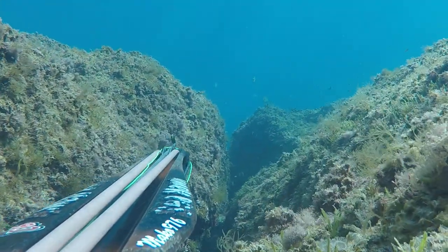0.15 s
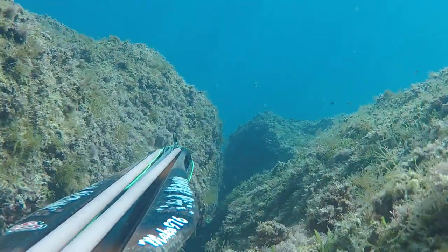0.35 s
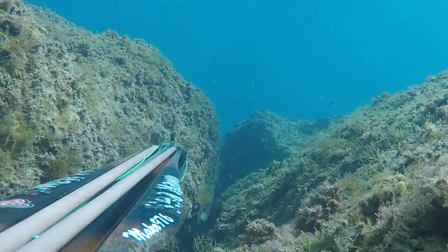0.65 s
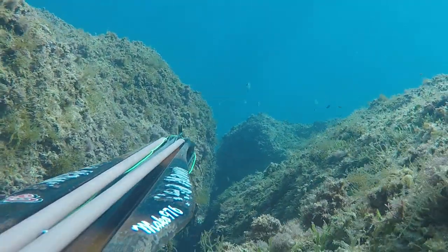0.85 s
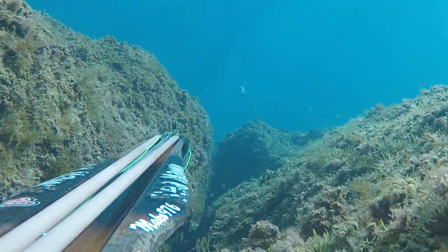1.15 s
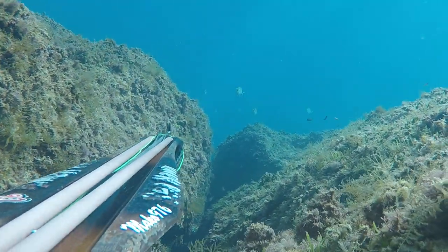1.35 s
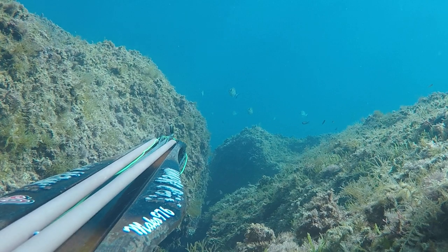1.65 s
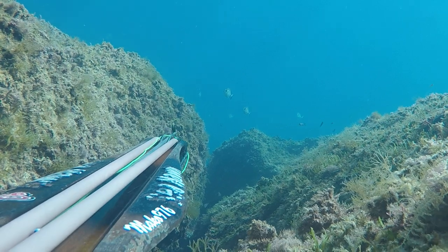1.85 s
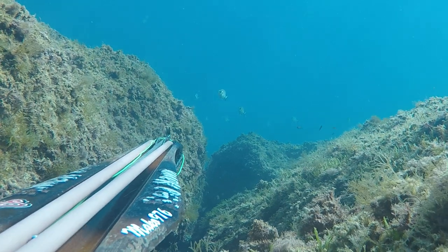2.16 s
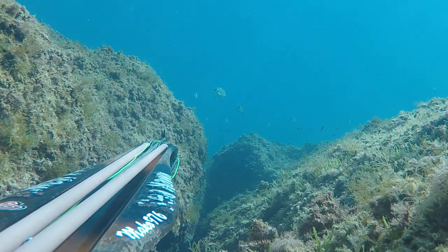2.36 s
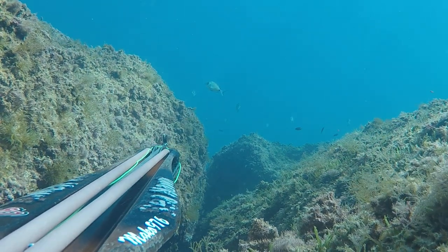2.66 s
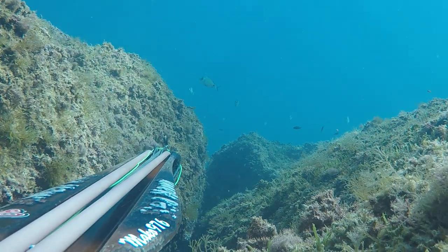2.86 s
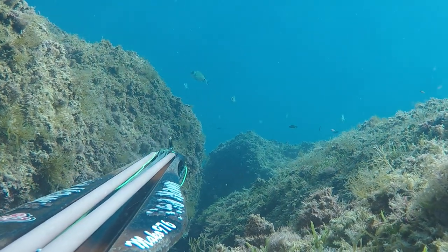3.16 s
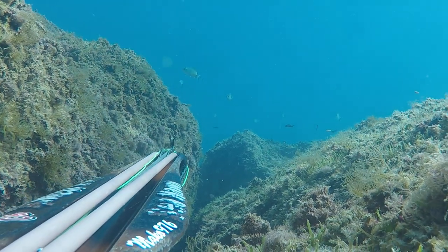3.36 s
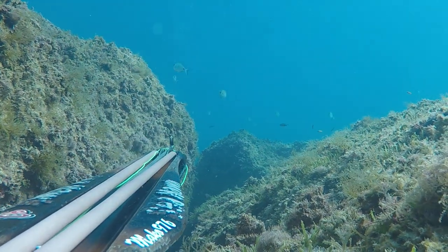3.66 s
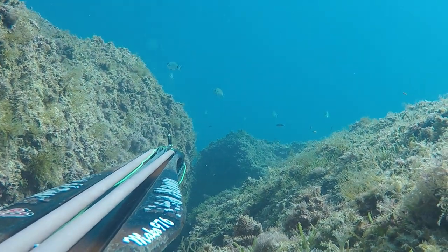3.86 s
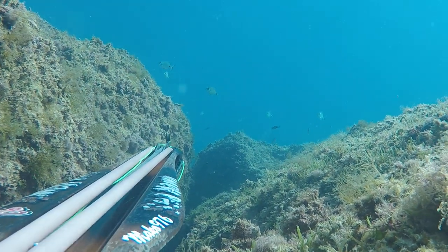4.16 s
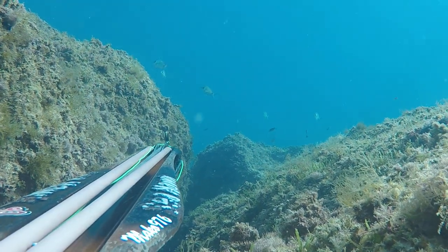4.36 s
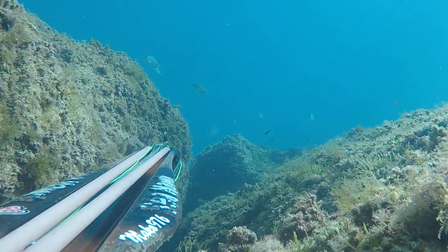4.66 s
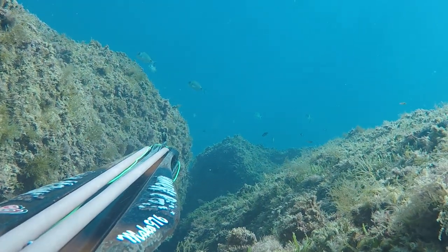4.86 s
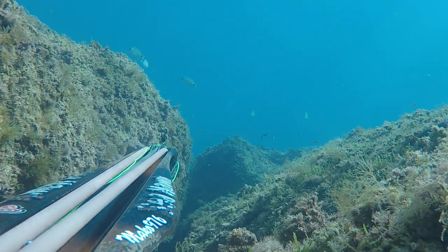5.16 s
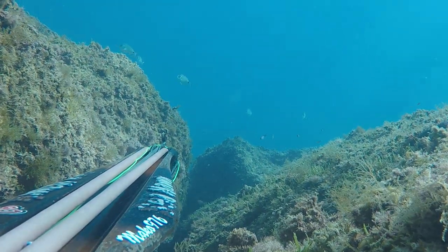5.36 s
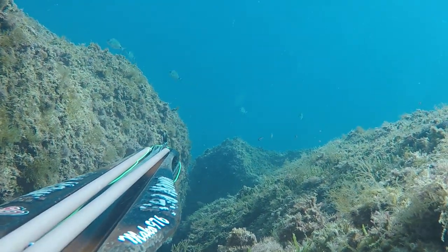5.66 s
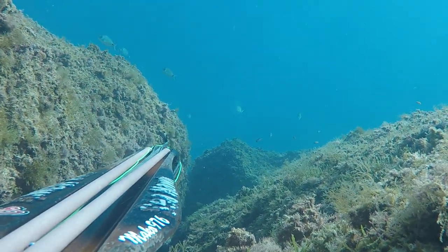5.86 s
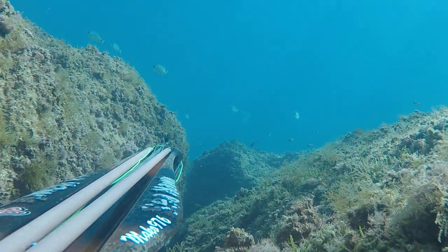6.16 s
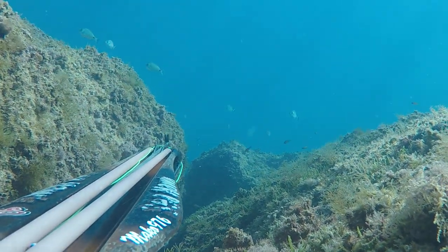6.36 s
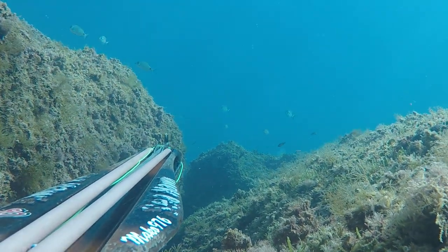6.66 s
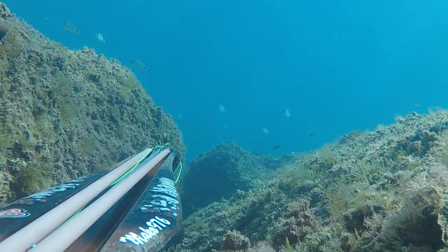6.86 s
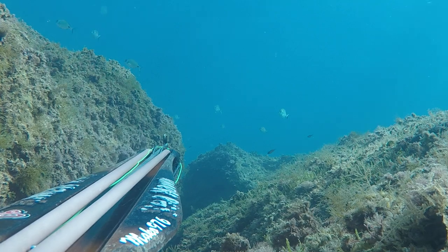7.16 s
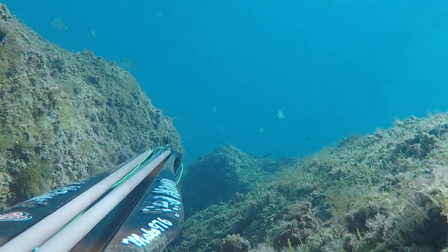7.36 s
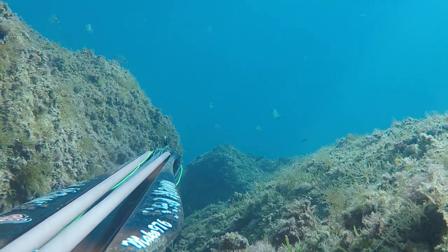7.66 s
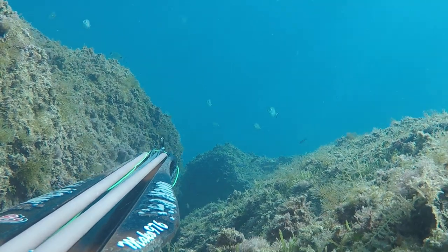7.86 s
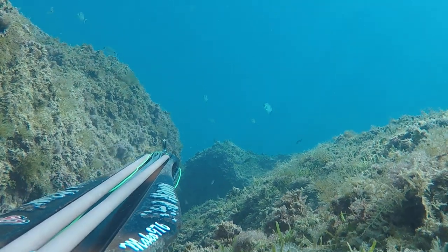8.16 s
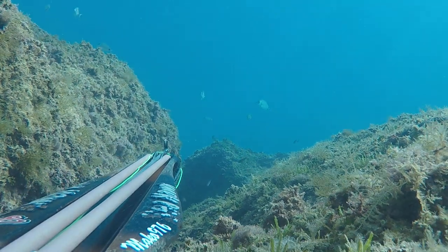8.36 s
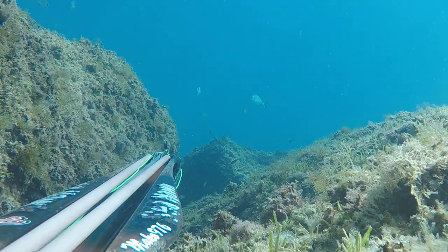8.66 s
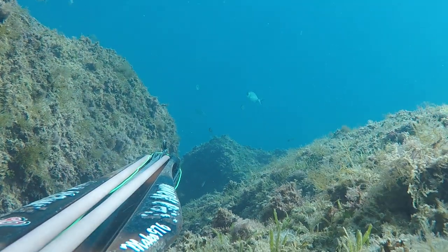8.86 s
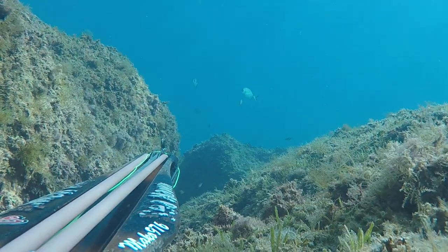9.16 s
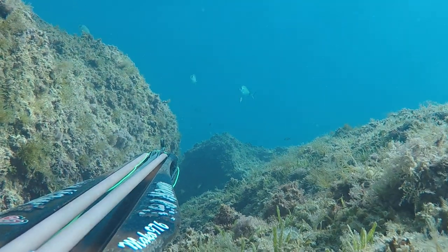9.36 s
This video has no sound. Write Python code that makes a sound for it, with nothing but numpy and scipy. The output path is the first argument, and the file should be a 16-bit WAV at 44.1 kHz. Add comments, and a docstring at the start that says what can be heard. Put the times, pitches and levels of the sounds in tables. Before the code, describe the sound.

Heard underwater through a sealed camera case, a constant uneven crackle of snapping shrimp sits over soft sea hiss and occasional bubble-like pops. The closest snaps ring the shell briefly. Soft taps and muffled rubbing of a diver's gear open the scene, followed by two pairs of low thuds, the second pair stronger. The shrimp carry on among the rocks, and light bumps and rubs return near the end.

```python
"""A camera in a sealed housing rests by a rocky sea floor. From the start, shrimp snap near and far and
ring the housing, over sea hiss and round pops. In the first 1.5 s, soft taps sound on the shell and light
knocks and rubs reach it through the diver's gear. Heavy double knocks land near 1.6, 1.8, 3.8 and 4 s;
the deep sway of the water then peaks. From 7.4 s the gear knocks and rubs again.
Two microphones inside hear the same shell, the left one weaker and shifted in phase."""
import sys
import numpy as np
from scipy import signal
from scipy.fft import rfft, irfft
from scipy.io import wavfile

SR = 44100
rng = np.random.default_rng(int(sys.argv[2]) if len(sys.argv) > 2 else 0)


def pcm_store(signal):
    """Save signal as 16-bit PCM."""
    levels = np.round(np.clip(np.atleast_2d(signal), -1, 1) * 32767)
    wavfile.write(sys.argv[1], SR, levels.astype(np.int16).T)


N = 418950
BIN_HZ = np.maximum(np.arange(N // 2 + 1) * SR / N, 1)

# Near shrimp snaps. Each row: start in seconds, wall ring in dB, bright ring in dB.
NEAR_SNAPS = [(0.06, -52, -24.5), (0.12, -61, -38), (0.149, -36.5, -35.5), (0.2845, -54, -35),
              (0.4242, -37.5, -30.5), (0.657, -34, -47), (0.6711, -31.5, -27.5), (0.704, -29.5, -19.5),
              (0.8063, -67, -36), (0.8247, -58, -39), (0.845, -29.5, -26.5), (0.9318, -25.5, -35),
              (1.024, -42, -32.5), (1.082, -29, -24), (1.1313, -36, -26), (1.135, -33, -25),
              (1.2445, -40, -23), (1.288, -41, -35), (1.305, -30, -37), (1.3114, -33.5, -22.5),
              (1.457, -36.5, -35), (1.516, -57, -29.5), (1.7135, -33, -39), (1.7488, -42, -29),
              (1.8548, -38.5, -36), (1.8988, -53, -33.5), (1.97, -31.5, -26.5), (2.254, -44, -31),
              (2.358, -30.5, -24.5), (2.683, -41.5, -26.5), (2.7408, -42, -36), (2.846, -40, -27.5),
              (2.911, -47, -36), (3.0002, -54, -30.5), (3.0656, -58, -33.5), (3.2076, -39, -27),
              (3.253, -55, -33), (3.3482, -28.5, -31), (3.353, -56, -21), (3.5379, -47.5, -30),
              (3.74, -67, -30.5), (3.803, -30, -64), (4.02, -39.5, -33.5), (4.0786, -69, -36),
              (4.1493, -47, -33), (4.213, -56, -31), (4.356, -46, -31), (4.5497, -54, -37),
              (4.561, -19, -56), (4.5656, -31, -26.5), (4.573, -28, -41), (4.6981, -51, -30),
              (4.8377, -44.5, -39), (4.9338, -48, -45), (4.9555, -58, -35), (5.0022, -44, -45),
              (5.106, -37, -26), (5.4018, -43, -34), (5.5432, -45, -32), (5.582, -45.5, -26.5),
              (5.6593, -66, -37), (5.728, -39.5, -23), (5.862, -38.5, -21), (5.9306, -51, -33),
              (6.04, -57, -27.5), (6.05, -37, -41), (6.114, -66, -38.5), (6.219, -68, -39),
              (6.4236, -48.5, -26), (6.522, -47, -24), (6.5956, -56, -29.5), (6.7815, -53, -35),
              (6.985, -66, -33), (7.0211, -56, -36.5), (7.077, -41, -31), (7.222, -63, -28),
              (7.256, -53, -34), (7.2928, -34.5, -34), (7.3392, -48, -33.5), (7.4206, -46.5, -28),
              (7.505, -50, -36), (7.583, -42, -33), (7.686, -66, -38), (7.724, -46, -34.5),
              (7.754, -46, -30), (7.784, -45, -29), (7.8575, -29.5, -24.5), (7.8994, -66, -36.5),
              (8.0084, -61, -31.5), (8.155, -45, -31), (8.3466, -50, -33.5), (8.478, -54, -31.5),
              (8.5195, -40, -33.5), (8.624, -41, -34), (8.711, -31.5, -25), (8.9196, -33.5, -27),
              (9.0445, -62, -35), (9.0755, -45, -32.5), (9.249, -47, -33.5), (9.353, -38, -39.5),
              (9.4739, -31.5, -33), (9.478, -56, -30.5)]
# Housing modes, three sets. Each row: frequency in Hz, gain in dB, T60 in seconds.
LOW_MODES = [(274, 4.5, 0.12), (349, 4, 0.11), (481, 9, 0.058), (635, 15, 0.026), (730, 12, 0.058),
             (910, 7, 0.032), (1184, 13, 0.022)]
WALL_MODES = [(1420, 1, 0.0031), (1813, -2.5, 0.033), (2153, -6, 0.02), (2503, -1.5, 0.0068),
              (3106, -12.5, 0.029), (3658, -3.5, 0.013)]
BRIGHT_MODES = [(4620, -22, 0.0074), (5370, -6, 0.007), (6360, -0.5, 0.0044), (7700, 1.5, 0.0058),
                (8280, -10, 0.0039), (12500, -25, 0.00055), (6700, 1, 0.0011)]   # last row: the dry crack itself
# Heavy knocks. Each row: time in seconds, level in dB, pitch in Hz, rebound delay in seconds,
# rebound level in dB.
HEAVY_KNOCKS = [(1.5624, -12, 179.6, 0.014, -10.5), (1.776, -12.5, 171.7, 0.0198, -7),
                (3.761, -4.5, 175.7, 0.02043, -3), (4.0139, -4.5, 171.7, 0.0197, -3)]
# Light knocks. Each row: peak time in seconds, level in dB, pitch in Hz, swell in seconds.
LIGHT_KNOCKS = [(0.2583, -31, 223, 0.0015), (0.3147, -26, 249, 0.0017), (0.3312, -26, 295, 0.0028),
                (0.4298, -19, 179, 0.0027), (0.5192, -29, 172, 0.009), (0.58, -25, 190, 0.0034),
                (2.2827, -25.5, 182, 0.0026), (4.303, -34, 204, 0.0015), (4.385, -27, 203, 0.003),
                (7.4507, -19, 180, 0.0043), (7.5126, -29.5, 207, 0.0079), (7.5982, -21.5, 199, 0.0035),
                (8.3338, -28, 203, 0.003), (8.575, -31, 182, 0.0029), (8.665, -31.5, 192, 0.0023),
                (8.62, -33, 258, 0.01)]
# Round pops. Each row: peak time in seconds, level in dB, pitch in Hz, swell in seconds.
POPS = [(0.0714, -30.5, 695, 0.0036), (0.3975, -30, 650, 0.0014), (0.6066, -28, 710, 0.0018),
        (0.9178, -31.5, 473, 0.0037), (0.959, -20.5, 678, 0.0017), (1.3958, -33, 654, 0.0056),
        (3.4385, -31.5, 568, 0.0015), (3.5292, -37, 565, 0.0015), (4.5663, -24.5, 640, .0029),
        (5.7839, -29.5, 674, 0.002), (5.8321, -31.5, 720, 0.0014), (6.0603, -31.5, 559, 0.0015),
        (6.625, -40, 730, 0.0034), (7.9521, -35, 685, 0.0024), (8.306, -38.5, 710, 0.0024),
        (8.6012, -29, 1160, 0.0015), (8.7907, -39, 671, 0.0036)]
# Taps on the shell. Each row: start in seconds, level in dB, centre in Hz, fall-off in dB per octave.
TAPS = [(0.578, -31.5, 910, 8), (0.655, -32.5, 516, -6), (0.678, -28, 487, 28), (0.823, -42.5, 810, 7),
        (3.802, -41.5, 600, -1), (6.424, -45, 412, 2)]
# Gear rubs. Each row: start of hold in seconds, hold in seconds, rumble in dB, creak in dB.
RUBS = [(0.046, 0.011, -49.5, -45.5), (0.214, 0.21, -34.5, -47), (0.668, 0.0092, -33, -38.5),
        (0.888, 0.043, -52, -34), (1.117, 0.29, -49.5, -52), (1.392, 0.02, -69, -44.5),
        (7.42, 0.24, -43.5, -53), (7.885, 0.51, -47.5, -59), (8.601, 0.018, -45, -46.5),
        (8.705, 0.19, -48, -50)]
# Sea hiss spectrum. Each row: frequency in Hz, relative level in dB.
HISS_SPECTRUM = [(90, -94), (133, 5.5), (172, 1.5), (883, -6), (1800, -16), (2300, -19), (3660, -22),
                 (4700, -26.5), (7610, -15.5), (10700, -26.5), (13600, -38.5), (15500, -42)]
# Hiss common to both microphones. Each row: frequency in Hz, share of power from 0 to 1.
HISS_COHERENCE = [(200, 0.11), (470, 0.88), (900, 0.97), (2000, 0.57), (5000, 0.2), (8000, 0.27),
                  (11000, 0)]
# Deep sway of the water. Each row: time in seconds, level in dB.
SWAY_LEVELS = [(0.5, -67), (1.2, -74), (3.6, -81), (4.15, -57), (4.598, -66.5), (6.5, -80), (8.5, -74),
               (8.65, -62), (8.9, -83)]
# Left microphone against right. Each row: frequency in Hz, gain in dB.
LEFT_GAIN = [(150, -4), (700, -6.5), (1200, -1.5), (3000, -1), (3600, -5), (4800, 0), (6300, -7),
             (7800, -13), (10500, -1)]
# Left phase lead; slow flexing reaches the two in opposition. Each row: frequency in Hz, lead in radians.
LEFT_LEAD = [(0, 3.1), (1400, 2.6), (1800, 1.2), (2500, 1.9), (3050, .7), (3900, .3), (5000, .9), (5600, 0),
             (6100, .8), (7300, -1.5), (8300, 0)]

SNAP_BAND_HZ, SNAP_DETUNE = (960, 9200), 0.04
FAR_PER_S, FAR_SPREAD_DB, FAR_WALL_DB, FAR_BRIGHT_DB, FAR_ECHO_DB = 70, 5.0, -66, -54, 3
ECHO_DB, ECHO_T60_S, ECHOES_PER_S, ECHO_PATH_S = -12.5, 0.053, 2600, 0.04
TOUCH_BEFORE_S, TOUCH_REL_DB, TOUCH_HZ, TOUCH_SWELL_S = 0.01347, -16, 203, 0.0027
BLOW_SWELL_S, REBOUND_SWELL_S, REBOUND_PITCH_RATIO = 0.0038, 0.0063, 0.94
FAINT_POPS_PER_S, FAINT_POP_DB, FAINT_POP_HZ, FAINT_POP_SWELL_S = 9, -43, 640, 0.0025
RUB_ATTACK_DB_PER_S, RUB_RELEASE_DB_PER_S, SLIPS_PER_S = 194, 170, 400
TAP_TOP_HZ, HISS_DB, GEAR_LEFT_DB = 1800, -46.5, -2.5
BASS_CUT_HZ, TREBLE_CUT_HZ = 142, 15700


def snaps(at, wall_db, bright_db, scatter_db):
    """A snap's shock rings the housing; its direction decides how hard each mode is hit."""
    wall_scatter, bright_scatter = np.hsplit(scatter_db * rng.standard_normal((len(at), 13)), [6])
    octaves = np.log2(np.array(WALL_MODES)[:, 0] / 1800)
    tilt_db = 0.39 * np.clip(bright_db - wall_db, -25, 15)[:, None] * octaves   # dull snaps spare the top
    wall = ring_modes(WALL_MODES, at, wall_db[:, None] + tilt_db + wall_scatter, 4.04, SNAP_DETUNE)
    bright = ring_modes(BRIGHT_MODES, at, bright_db[:, None] + bright_scatter, 3.0, SNAP_DETUNE)
    return band(wall + bright, *SNAP_BAND_HZ)


def near_snaps():
    """Near shrimp, heard one by one."""
    start_s, wall_db, bright_db = np.transpose(NEAR_SNAPS)
    return snaps((start_s * SR).astype(int), wall_db, bright_db, scatter_db=1.8)


def far_snaps():
    """Distant shrimp crackle in waves: mostly faint, a few stand out."""
    at = np.flatnonzero(rng.random(N) < FAR_PER_S * amp(3.0 * drift(3)) / SR)
    size_db = FAR_SPREAD_DB * np.minimum(rng.exponential(1, len(at)), 2.4)
    colour_db = 3.5 * rng.standard_normal(len(at))
    return snaps(at, FAR_WALL_DB + size_db + colour_db, FAR_BRIGHT_DB + size_db, scatter_db=3.0)


def rock_echoes(x):
    """Rocks scatter fast-dying returns; new paths for each microphone and each short stretch."""
    t = np.arange(int(0.1 * SR)) / SR
    step = round(ECHO_PATH_S * SR)
    out = np.zeros((2, N + step + len(t)))
    decay = amp(ECHO_DB - 60 * t / ECHO_T60_S) * (t > 0.0025)
    for i in range(0, N, step):
        returns = rng.choice([-1, 1], (2, len(t))) * (rng.random((2, len(t))) < ECHOES_PER_S / SR)
        echo = signal.fftconvolve(x[:, i:i + step], returns * decay, axes=1)
        out[:, i:i + echo.shape[1]] += echo
    return out[:, :N]


def heavy_knock_parts():
    """A light touch, the blow, then a longer, lower rebound."""
    for time_s, db, hz, delay_s, rebound_db in HEAVY_KNOCKS:
        yield time_s - TOUCH_BEFORE_S, db + TOUCH_REL_DB, TOUCH_HZ, TOUCH_SWELL_S
        yield time_s, db, hz, BLOW_SWELL_S
        yield time_s + delay_s, rebound_db, hz * REBOUND_PITCH_RATIO, REBOUND_SWELL_S


def knocks():
    """Knocks through the gear: low tone bursts with a rough edge."""
    body = tone_bursts([*LIGHT_KNOCKS, *heavy_knock_parts()], ring_db=-20.5)
    rough = band(np.abs(body) * rng.standard_normal(N), 200, 500)
    return body + amp(-14) * rough


def pops():
    """Round pops, perhaps bubbles by the shell; faint ones fall at random between them."""
    count = round(FAINT_POPS_PER_S * N / SR)
    when, softness, pitch = rng.random((3, count))
    hz = FAINT_POP_HZ * 2 ** (0.5 * (pitch - 0.5))
    faint = zip(when * N / SR, FAINT_POP_DB - 8 * softness, hz, np.full(count, FAINT_POP_SWELL_S))
    return tone_bursts([*POPS, *faint], ring_db=-13.0)


def taps():
    """A soft tap rings the low modes; the contact grinds on in two weaker hits."""
    start_s, db, centre_hz, db_per_octave = np.transpose(TAPS)
    delay_s = np.cumsum(rng.uniform(0.001, 0.006, (len(start_s), 3)), axis=1) * (np.arange(3) > 0)
    octaves = np.log2(np.array(LOW_MODES)[:, 0] / centre_hz[:, None])
    mode_db = db[:, None] - db_per_octave[:, None] * np.abs(octaves)
    hit_db = mode_db[:, None] - 1800 * delay_s[:, :, None]   # axes: tap, hit, mode
    at = ((start_s[:, None] + delay_s) * SR).astype(int).ravel()
    ring = ring_modes(LOW_MODES, at, hit_db.reshape(-1, len(LOW_MODES)), stereo_db=2.2)
    return low_pass(ring, TAP_TOP_HZ)


def rub_envelope(column):
    """Each rub rises, holds and falls away; column picks rumble or creak."""
    t = np.arange(N) / SR
    gain = np.zeros(N)
    for row in RUBS:
        start_s, hold_s = row[:2]
        attack_db = RUB_ATTACK_DB_PER_S * np.maximum(start_s - t, 0)
        release_db = RUB_RELEASE_DB_PER_S * np.maximum(t - start_s - hold_s, 0)
        gain += amp(row[column] - attack_db - release_db)
    return gain


def rub_rumble():
    """Rubbing gear shakes the whole housing in lumps."""
    noise = band(band(rng.standard_normal(N), 140, 247), 133, 318)
    lumps = noise * amp(2.2 * drift(11))
    return rub_envelope(column=2) * unit_rms(lumps)


def rub_creak():
    """Uneven slips of a rub ring the low modes."""
    slips = np.flatnonzero(rng.random(N) < SLIPS_PER_S / SR)
    slip_db = 7.1 * rng.standard_normal((len(slips), len(LOW_MODES)))
    ring = ring_modes(LOW_MODES, slips, slip_db, stereo_db=2.5)
    return rub_envelope(column=3) * unit_rms(ring)


def sea_hiss():
    """Steady sea noise, partly shared by the microphones; the lows waver."""
    shared, left, right = rfft(rng.standard_normal((3, N))) * amp(per_bin(HISS_SPECTRUM))
    coherence = np.clip(per_bin(HISS_COHERENCE), 0, 1)
    spectra = np.sqrt(coherence) * shared + np.sqrt(1 - coherence) * np.array([left, right])
    hiss = unit_rms(irfft(spectra, N))
    waver = amp(1.5 * drift(15))
    return amp(HISS_DB) * (hiss + (waver - 1) * band(hiss, 100, 1600))


def water_sway():
    """Water pushes slowly on the housing, below the other sounds."""
    side, shared = low_pass(rng.standard_normal((2, N)), 35)
    push = np.array([0.55 * shared + 0.25 * side, shared])
    level_db = np.interp(np.arange(N) / SR, *np.transpose(SWAY_LEVELS))
    return amp(level_db) * unit_rms(band(push, 21, 150))


def ring_modes(modes, at, hit_db, stereo_db, detune=0.0):
    """Clicks at samples `at` ring damped modes; hit_db has a row per click, a column per mode."""
    out = np.zeros((2, N))
    pan_db = stereo_db * rng.standard_normal(hit_db.shape)
    spots = 4 if detune else 1   # where a blow lands shifts the modes a little
    spot_of_hit = rng.integers(0, spots, len(at))
    for k, (hz, mode_db, t60_s) in enumerate(modes):
        radius = amp(-60 / (t60_s * SR))
        for spot, shift in enumerate(rng.permutation(np.linspace(-detune, detune, spots))):
            here = spot_of_hit == spot
            clicks = np.full((2, N), 1e-18)
            for side, sign in enumerate((1, -1)):
                gain = amp(hit_db[here, k] + mode_db + sign * pan_db[here, k])
                np.add.at(clicks[side], at[here], gain * (-1) ** k)
            w = 2 * np.pi * hz * (1 + shift) / SR
            out += signal.lfilter([0, np.sin(w)], [1, -2 * radius * np.cos(w), radius ** 2], clicks)
    return out


def tone_bursts(rows, ring_db):
    """Per row, a few cycles that swell and fade, with a faint after-ring."""
    before, after = 2600, 5200   # samples around the peak
    t = np.arange(-before, after) / SR
    out = np.zeros(N + len(t))
    for peak_s, db, hz, swell_s in rows:
        swell = np.exp(-0.5 * (t / (swell_s * np.where(t < 0, 1.0, 1.2))) ** 2)
        ring = amp(ring_db) * np.exp(-np.abs(t) / np.where(t < 0, 0.008, 0.022))
        out[round(peak_s * SR):][:len(t)] += amp(db) * (swell + ring) * np.cos(2 * np.pi * hz * t)
    return out[before:before + N]


def through_shell(x, lead_rad, left_db=0.0):
    """The shell gives the left microphone another gain and phase than the right."""
    response = amp(per_bin(LEFT_GAIN) + left_db) * np.exp(1j * lead_rad)
    return np.array([irfft(rfft(x[0]) * response, N), x[1]])


def drift(rate_hz):
    """Slow random wander, rms near 1."""
    hop = 40
    pole = np.exp(-2 * np.pi * rate_hz * hop / SR)
    slow = signal.lfilter([1], [1, -2 * pole, pole ** 2], rng.standard_normal(N // hop + 2002))[2000:]
    return np.interp(np.arange(N) / hop, np.arange(len(slow)), unit_rms(slow))


def per_bin(table):
    """A (Hz, value) table at every FFT bin, on a log axis."""
    hz, values = np.transpose(table)
    return np.interp(np.log(BIN_HZ), np.log(hz), values)


def band(x, low_hz, high_hz):
    return signal.sosfilt(signal.butter(2, [low_hz, high_hz], "band", fs=SR, output="sos"), x)


def low_pass(x, top_hz):
    return signal.sosfilt(signal.butter(2, top_hz, fs=SR, output="sos"), x)


def amp(db):
    return 10 ** (np.asarray(db) / 20)


def unit_rms(x):
    return x / np.sqrt(np.mean(x ** 2) + 1e-20)


def scene():
    """Water-borne sound flexes the shell; gear lows move it whole, the microphones nearly in step."""
    lead_rad = np.interp(BIN_HZ, *np.transpose(LEFT_LEAD))
    near, far = near_snaps(), far_snaps()
    echoes = rock_echoes(near + amp(FAR_ECHO_DB) * far)   # distant snaps arrive more blurred
    water = through_shell(near + far + echoes + sea_hiss(), lead_rad)
    thuds = np.roll(knocks(), -round(0.004 * SR))   # 4 ms early: the bass cut delays them
    contact = thuds + rub_rumble() + pops() + taps() + rub_creak()
    flexing = np.clip((BIN_HZ - 350) / 250, 0, 1)
    rigid = 1 - flexing
    gear = through_shell(contact, flexing * lead_rad - 0.2 * rigid, GEAR_LEFT_DB * rigid)
    bass_cut = signal.butter(6, BASS_CUT_HZ, "high", fs=SR, output="sos")   # steep recorder low cut
    return signal.sosfilt(bass_cut, water + gear) + water_sway()


def record(dry):
    """Steep treble cut."""
    return signal.sosfilt(signal.cheby2(12, 70, TREBLE_CUT_HZ, fs=SR, output="sos"), dry)


dry = scene()
out = record(dry)
pcm_store(out)
```